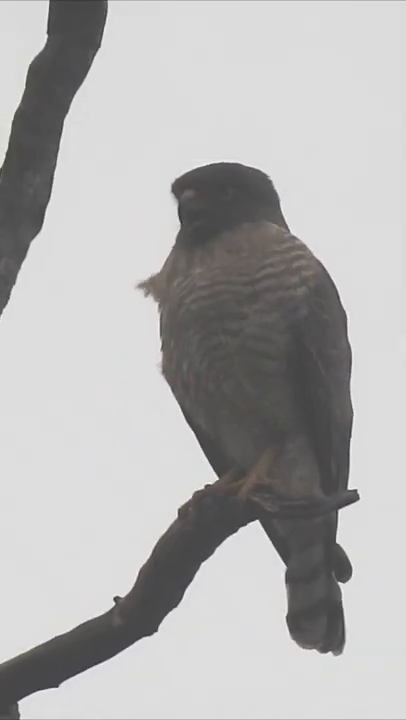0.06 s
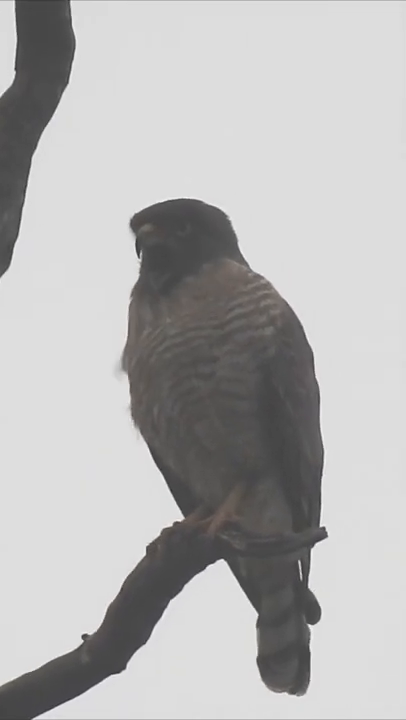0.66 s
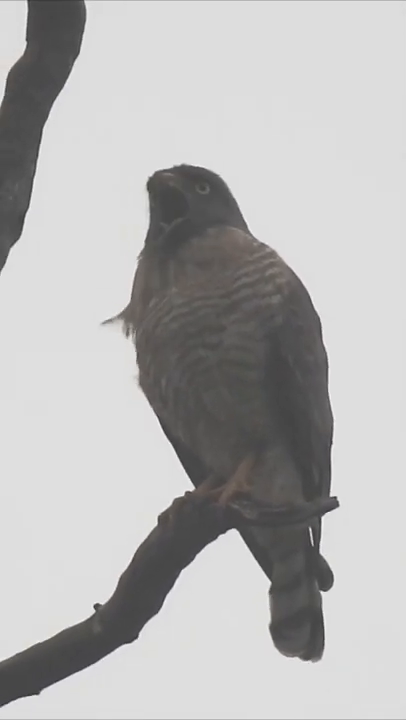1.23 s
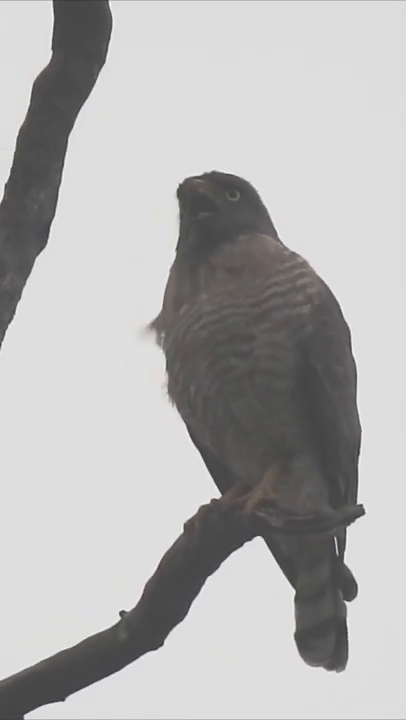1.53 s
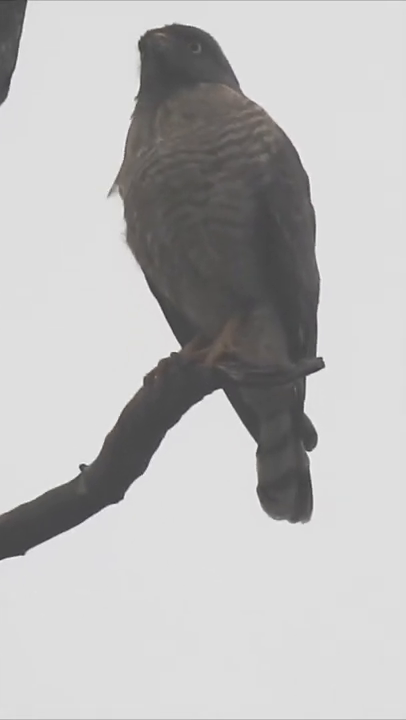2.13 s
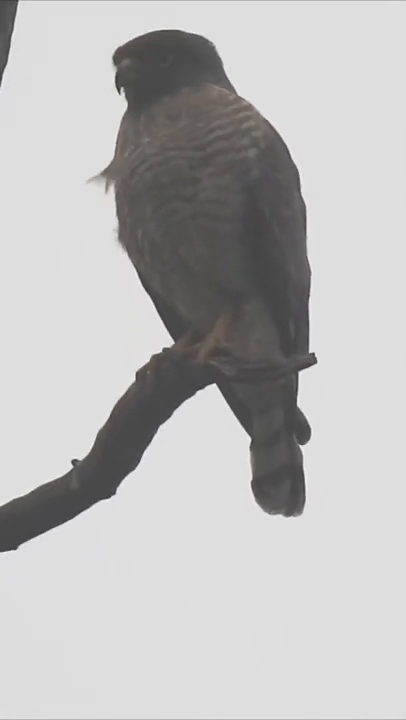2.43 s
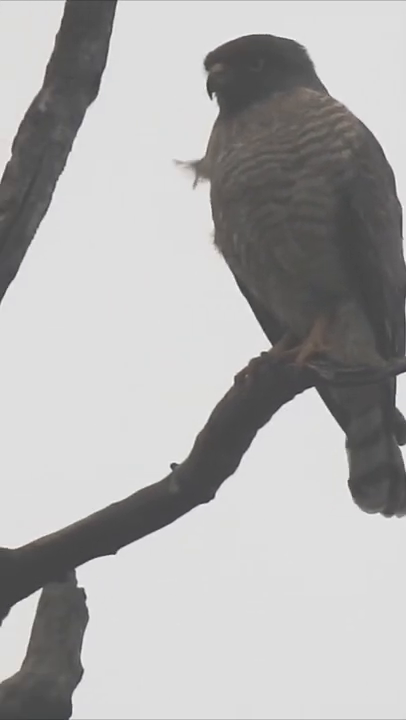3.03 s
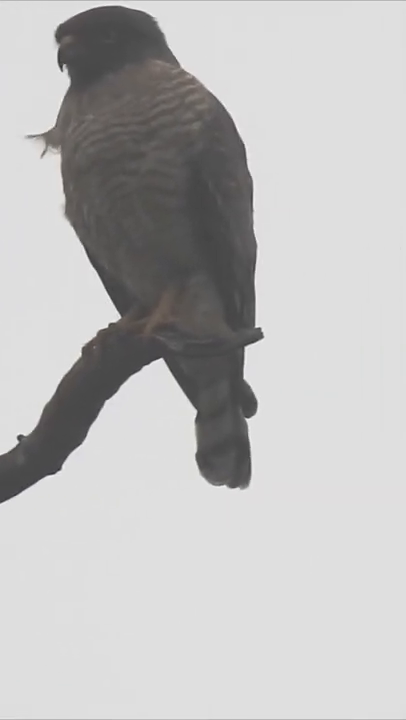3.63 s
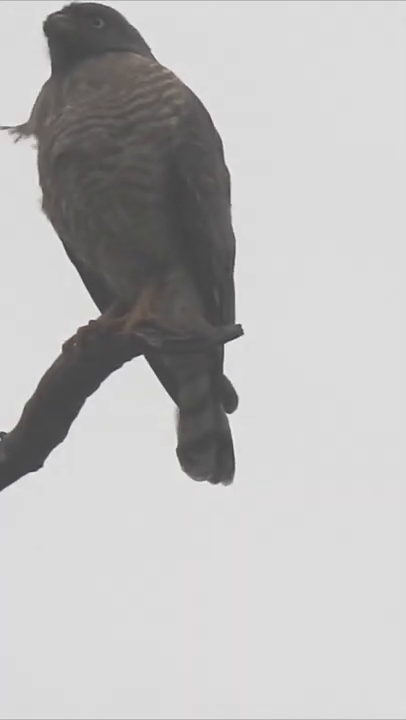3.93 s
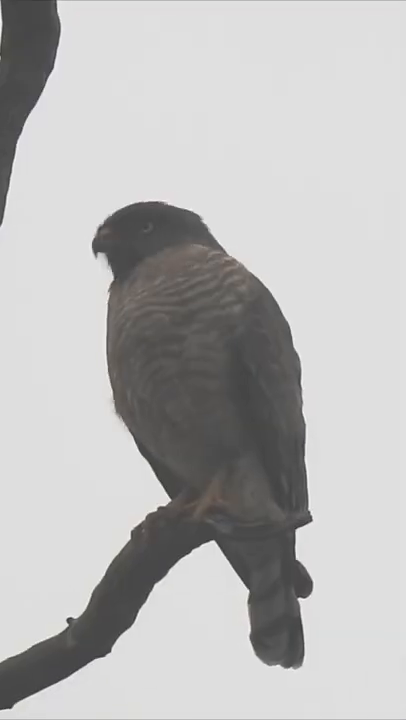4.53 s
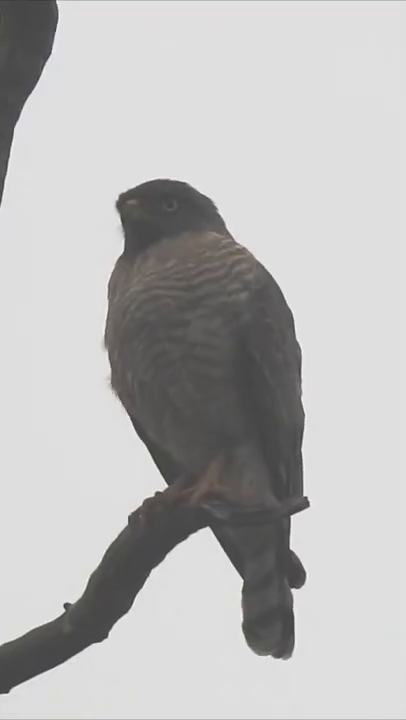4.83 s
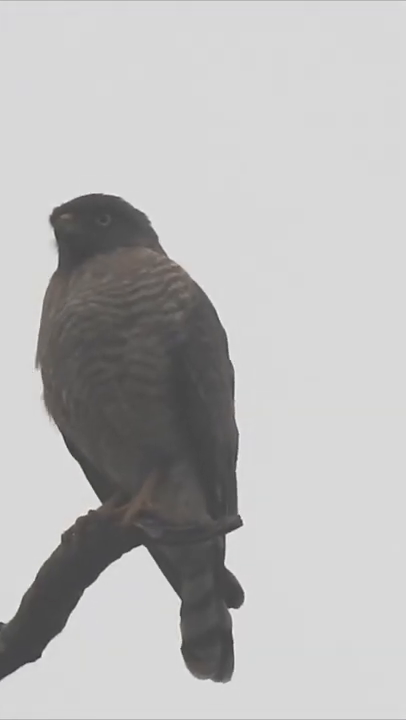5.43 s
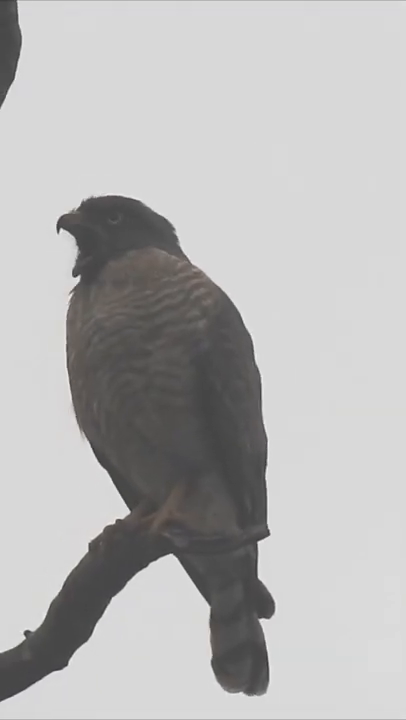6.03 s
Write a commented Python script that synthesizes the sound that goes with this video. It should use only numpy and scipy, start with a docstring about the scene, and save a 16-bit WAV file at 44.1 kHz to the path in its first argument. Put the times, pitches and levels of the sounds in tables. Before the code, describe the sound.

In quiet woods, a hawk screams almost at once: a sharp, raspy rise followed by a drawn-out falling whistle that weakens and ends roughly. Soft, low wind buffets the microphone in the first couple of seconds. Then only a faint hiss and a small bird's scattered, tick-like high chirps remain, until the hawk starts another loud scream just before the end.

```python
"""A hawk on a bare branch gives one long scream and begins a second.
Its voice box shoots up in pitch, turns harsh and doubled at the top, then sinks as a clean whistle
and dies in a rattle as the breath runs out. A small bird chirps in the trees and there is one faint tick.
Air buffets the microphone over the soft hiss of the woods."""
import sys
import numpy as np
from scipy import signal
from scipy.fft import rfft, irfft, next_fast_len
from scipy.io import wavfile
from scipy.ndimage import uniform_filter1d

SR = 44100
rng = np.random.default_rng(int(sys.argv[2]) if len(sys.argv) > 2 else 0)


def put_to_file(sound):
    """Save the sound as 16-bit audio at rate SR, in the file named by the first command-line argument."""
    columns = np.atleast_2d(sound).T  # one column per channel
    safe = np.clip(columns, -1, 1)
    whole_steps = np.round(safe * 32767)
    wavfile.write(sys.argv[1], SR, whole_steps.astype(np.int16))


N = 276948
TIME = np.arange(N) / SR


# How the throat and open beak shape the voice. Each row: frequency in Hz, boost or cut in dB.
THROAT_COLOUR = [(700, -18.5), (1200, -20.5), (1850, -11), (2120, -23.5), (2220, -17.5), (2400, -7.5),
                 (3000, 7), (3700, 7), (4200, -5), (4600, -21), (5300, -9.5), (6700, -4), (7900, -11),
                 (8600, -28.5), (10200, -25), (11400, -30.5), (12200, -58)]

def hawk(split_hz=4600, flutter_db=1.35, twigs_db=-12, far_db=-41):
    """The voice passes through throat and beak; effort sets how loud and how bright it is."""
    pitch_hz, gain, treble_db, (rasp, doubled, quivering, rattling) = scream_shape()
    pulses, stagger = rattle(rattling)
    buzz = voice_box(pitch_hz * stagger, rasp, doubled, quivering, rattling)
    voice = colour(buzz * pulses, THROAT_COLOUR)
    body, treble = (steady(cut(voice, split_hz, kind, order=8)) for kind in ("low", "high"))
    call = (body + from_db(treble_db) * treble) * gain * from_db(flutter_db * drift(64.1))
    highs = cut(call, 6000, "high", order=1)   # thin twigs reflect high sounds best
    twigs = from_db(twigs_db) * echoes(highs, fade_s=.028)
    far = from_db(far_db) * echoes(call, fade_s=0.65)
    return call * pan(-0.61) + twigs + far


# The screams. Each row: start in seconds, relative level in dB, then the seconds from that start until
# the middle of the upward leap, the start of the doubled tone, its end, and the break in the voice.
SCREAM_TIMINGS = [(0.244, -0.5, .066, 0.0964, .21, 0.25), (5.977, -2, .057, .096, .198, 0.263)]
# How the pitch sinks, one list for each scream. Each row: time in seconds, pitch to aim for in Hz.
SINKING_PITCH = [
    [(0.39, 2107), (0.4, 2105), (0.428, 2047), (0.458, 1909), (0.496, 1787), (0.506, 1696), (0.546, 1638),
     (0.586, 1567), (0.624, 1523), (0.648, 1460), (0.696, 1452), (0.778, 1353), (1.034, 1256),
     (1.108, 1241), (1.162, 1188), (1.19, 1205), (1.262, 1185), (1.41, 1157)],
    [(6.1, 2088), (6.12, 2097), (6.144, 2080), (6.186, 1877), (6.232, 1789), (6.275, 1635)],
]
# Fading effort. Each row: seconds since the break, level change in dB, treble change in dB.
EFFORT = [(0, -5, 6.5), (.11, -4, -3), (.29, -14, 5.5), (.6, -15.5, 1), (0.709, -14, -1.5), (.77, -19, -3),
          (0.882, -17, -6), (1.13, -21.5, -5.5)]

def scream_shape(foot_hz=1020, leap_width=.22, switch_s=0.0098, quiver_until_s=.425,
                 rattle_from_s=1.185, release_from_s=1.393, release_db_per_s=450):
    """The voice leaps, doubles, breaks, sinks and rattles: gives its pitch, gain, treble and states."""
    rows = np.array(SCREAM_TIMINGS)
    latest = np.maximum(np.searchsorted(rows[:, 0], TIME) - 1, 0)
    start, scream_db, leap_s, doubles_s, clears_s, breaks_s = rows[latest].T
    age = TIME - start

    # Each state runs from 0 (off) to 1 (on).
    at_top = ramp(age - doubles_s, switch_s)
    doubled = at_top * ramp(clears_s - age, switch_s)
    broken = ramp(age - breaks_s, width_s=0.00575)   # a quick change of register, like a yodel
    quivering = broken * ramp(quiver_until_s - age, width_s=0.023)
    rattling = ramp(age - rattle_from_s, width_s=0.102)
    rasp = (0.05 + 0.55 * (1 - at_top) + 0.343 * rattling
            + 0.846 * at_top * die_away(age - clears_s, decay_s=0.047)
            + 0.23 * broken * die_away(age - breaks_s, decay_s=0.25))

    scoop = 1 - .38 * die_away(age, decay_s=.009)   # starts flat and slides up to the foot of the leap
    leap = .5 + .5 * np.tanh((age / leap_s - 1) / (2 * leap_width))   # an S-curve from 0 to 1
    aim_hz = np.choose(latest, [over_time(curve) for curve in SINKING_PITCH])
    pitch_hz = scoop * (foot_hz + leap * (aim_hz - foot_hz)) * (1 + .03 * rattling)

    gentle = 1 - np.clip(leap / 0.7, 0, 1) ** 2   # full force comes 70% of the way up the leap
    since_s, *fades = np.transpose(EFFORT)
    fade_db, fade_treble_db = (broken * np.interp(age - breaks_s, since_s, fade) for fade in fades)
    release_db = release_db_per_s * np.clip(age - release_from_s, 0, 1)
    # Doubling drains the main tone into the treble.
    level_db = -15 + scream_db - 13 * gentle - 6 * doubled + fade_db - release_db
    treble_db = -4.5 + 3 * gentle + 6.5 * doubled + fade_treble_db
    fade_in = np.clip(age / 0.04, 0, 1)
    return pitch_hz, fade_in * from_db(level_db), treble_db, (rasp, doubled, quivering, rattling)


# The voice's harmonics, at 1, 2, 3 .. times the pitch. Each entry: strength in dB.
HARMONIC_LEVELS = [1, -0.5, -10, -11, -14, -24, -21, -23, -31]
# The extra tones of the doubled voice, at 0.5, 1.5, 2.5 .. times the pitch. Each entry: strength in dB.
IN_BETWEEN_LEVELS = [-14.5, -11.5, -7, -10, -23.5]

def voice_box(pitch_hz, rasp, doubled, quivering, rattling, jitter=.022, waver=.002,
              quiver_hz=433, rattle_quiver_hz=292, shimmer_db=3.3, breath_db=-10):
    """A slightly uneven vibration; when forced, every other cycle differs, adding in-between tones."""
    # After the break a second, slower vibration bends both pitch and strength.
    slow_hz = quiver_hz + (rattle_quiver_hz - quiver_hz) * rattling
    slow_phase = phase_of(slow_hz * (1 + 0.11 * rasp * drift(120)))
    swing = 0.15 * quivering + 0.25 * rattling
    unsteady = 1 + jitter * rasp * drift(457) + waver * drift(41)
    phase = phase_of(pitch_hz * unsteady) + swing * np.sin(slow_phase)
    tone = np.zeros(N)
    for k, level_db in enumerate(HARMONIC_LEVELS, 1):
        strength = from_db(level_db + shimmer_db * drift(3.64))   # each harmonic wavers on its own
        tone += strength * np.sin(k * phase) * (k * pitch_hz < SR / 2)
    slip = 0.59 * drift(302.2)   # the doubling is unstable, which blurs its tones
    for k, level_db in enumerate(IN_BETWEEN_LEVELS, 1):
        tone += doubled * from_db(level_db) * np.sin((k - .5) * phase + slip)
    throb = 1 + 0.17 * swing * np.cos(slow_phase)
    breath = rng.standard_normal(N) * (1 + np.cos(phase))
    return tone * throb + from_db(breath_db) * rasp * breath


def rattle(rattling, pulses_per_s=112, full_depth=0.54, unevenness=0.22, wobble=0.07):
    """As the breath runs out, the tone breaks into pulses and its pitch staggers."""
    depth = full_depth * rattling
    beat = np.cos(phase_of(pulses_per_s * (1 + unevenness * drift(80.2))))
    pulses = 1 + depth * np.tanh(2 * beat)
    stagger = 1 + wobble * depth * drift(211)
    return pulses, stagger


# The small bird's chirps. Each row: start in seconds, level in dB, boost or cut of the direct sound in dB,
# length in seconds, first and last pitch in Hz, how much it lingers mid-slide from 0 to 1.
BIRD_CHIRPS = [(1.855, -28, -5.5, .036, 5750, 7740, 0.02), (2.295, -19.5, 0, .018, 7820, 4330, 0.94),
               (2.951, -39.5, 0.5, .017, 6300, 8150, 0), (3.711, -33, -7, .036, 6940, 8630, 0.15),
               (4.174, -19, 6, 0.016, 5680, 10030, 0), (4.465, -20, 4, 0.016, 5780, 10300, 0),
               (5.339, -18, -3.5, .013, 5680, 9700, 0.06), (5.983, -18, 1.5, .012, 6200, 9460, 0)]

def small_bird(peak_at=0.3, leaves_db=-1):
    """Quick, pure sliding notes that swell and fade, smeared by the leaves they pass through."""
    song, direct = np.zeros((2, N))
    for start_s, level_db, direct_db, length_s, first_hz, last_hz, linger in BIRD_CHIRPS:
        along = np.linspace(0, 1, int(length_s * SR))
        slide = along + linger * np.sin(2 * np.pi * along) / (2 * np.pi)
        pitch_hz = first_hz * (last_hz / first_hz) ** slide
        swell = np.interp(along, [0, peak_at, 1], [0, 1, 0])
        note = from_db(level_db) * swell * np.sin(phase_of(pitch_hz))
        span = slice(int(start_s * SR), int(start_s * SR) + len(note))
        song[span] += note
        direct[span] += from_db(direct_db) * note
    ears = np.array([direct, np.roll(direct, 2)]) * pan(-2.4)   # a little later and louder on the right
    return ears + from_db(leaves_db) * echoes(song, fade_s=0.13)


# The tick. Its two numbers: start in seconds, starting level in dB.
TICK_EVENT = (3.052, -40)
# The tick's tone. Each row: frequency in Hz, relative strength in dB.
TICK_TONE = [(800, -25), (1900, 10), (3500, -23), (6500, 7), (11000, -25)]

def tick(decay_s=0.0024):
    """One faint, dry tick: a burst of noise that dies at once."""
    start_s, level_db = TICK_EVENT
    burst = (TIME >= start_s) * die_away(TIME - start_s, decay_s)
    return from_db(level_db) * burst * air_noise(TICK_TONE)


# How the buffeting and the rumble rise and fall. Each row: time in seconds, relative level in dB.
BUFFET_LEVELS = [(0.0, -48.5), (0.24, -58), (0.47, -45.5), (0.86, -50), (1.26, -39.5), (1.59, -46),
                 (1.85, -44), (2.33, -52.5), (2.68, -55.5), (3.81, -53.5), (4.09, -56), (6.28, -54)]
RUMBLE_LEVELS = [(0.0, -52), (0.03, -67), (0.53, -48), (0.62, -66), (0.9, -40), (0.95, -67), (1.48, -46),
                 (1.52, -63.5), (4.09, -68), (4.85, -50), (5.27, -65), (5.46, -57), (5.58, -72), (6.2, -46)]
# Single puffs of air. Each row: start in seconds, relative peak level in dB.
AIR_PUFFS = [(0.229, -34), (0.393, -32.5), (0.443, -27), (0.487, -21.5), (0.569, -26.5), (0.935, -31),
             (1.078, -35), (1.209, -19.5), (1.282, -27), (1.7, -32), (1.874, -23), (1.93, -29),
             (2.033, -27.5), (2.232, -34.5)]
# The tone of buffeting, rumble and puffs. Each row: frequency in Hz, relative strength in dB.
BUFFET_TONE = [(41, -61), (70, -13), (123, 0), (172, 2), (242, -0.5), (544, -17.5), (600, -14.5),
               (780, -61), (1320, -120)]
RUMBLE_TONE = [(20, -32), (45, 1.5), (65, 10), (95, -2.5), (160, -39)]
PUFF_TONE = [(40, -45.5), (90, -21), (130, -1.5), (175, -1.5), (250, -6), (380, -18.5), (550, -40),
             (1000, -64)]

def wind(lumpy_db=2, buffet_db=1, rumble_db=-2, puff_db=-5, puff_rise_s=0.0075):
    """Air buffets the microphone over a deep rumble, and single puffs strike its right side."""
    buffet = air_noise(BUFFET_TONE) * from_db(buffet_db + over_time(BUFFET_LEVELS) + lumpy_db * drift(9.4))
    pressure = np.zeros(N)
    for start_s, peak_db in AIR_PUFFS:
        age = np.clip((TIME - start_s) / puff_rise_s, 0, 20)
        pressure += from_db(peak_db + puff_db) * age * np.exp(1 - age)
    puff_noise = steady(colour(rng.standard_normal(N), PUFF_TONE))
    puffs = cut(pressure * puff_noise, 95, "high")
    rumble = air_noise(RUMBLE_TONE) * from_db(rumble_db + over_time(RUMBLE_LEVELS))
    return buffet * pan(-0.96) + puffs * pan(-38) + rumble * pan(-2)


# The tone of the distant woods. Each row: frequency in Hz, relative strength in dB.
WOODS_TONE = [(150, -17), (250, -4.5), (347, 2), (398, 0.5), (466, 0.5), (692, -2), (768, -2.5),
              (837, -3.5), (2130, -12.5), (2950, -11.5), (3890, -12), (4320, -9), (5790, -4.5), (8770, -18),
              (15500, -32)]

def woods(level_db=-49, sway_db=1.12):
    """The far hiss of leaves and insects, swaying a little."""
    return air_noise(WOODS_TONE) * from_db(level_db + sway_db * drift(13))


# How alike the air sounds on the left and right. Each row: frequency in Hz, likeness from 0 to 1.
EAR_LIKENESS = [(60, 0.61), (150, 0.61), (380, 0.87), (950, 0.73), (2380, 0.51), (5980, 0.027),
                (15000, 0.01)]

def air_noise(tone):
    """Stereo noise with the given tone, partly alike in both ears."""
    shared, different = rfft(rng.standard_normal((2, N)))
    alike = np.clip(over_frequency(EAR_LIKENESS, N), 0, 1)
    ears = np.sqrt(1 + alike) * shared + np.sqrt(1 - alike) * different * [[1], [-1]]
    return unit_power(colour(irfft(ears, N), tone))


def echoes(x, fade_s):
    """Many faint reflections off twigs and leaves, different at each ear, falling 60 dB in fade_s."""
    t = TIME[:SR]
    tail = rng.standard_normal((2, SR)) * from_db(-60 * t / fade_s) * (t > .002)
    tail /= np.sqrt(np.sum(tail ** 2, axis=1, keepdims=True))
    return signal.fftconvolve(x[None], tail, axes=1)[:, :N]


def colour(x, tone):
    """Boost or cut each frequency by a table of Hz and dB."""
    size = next_fast_len(N + SR)
    return irfft(rfft(x, size) * from_db(over_frequency(tone, size)), size)[..., :N]


def cut(x, hz, kind, order=2):
    """Keep only the "low" or the "high" side of a frequency."""
    return signal.sosfilt(signal.butter(order, hz, kind, fs=SR, output="sos"), x)


def over_time(rows):
    """Join a table's points into a value for every sample."""
    return np.interp(TIME, *np.transpose(rows))


def over_frequency(rows, size):
    """Join a table's points into a value for every frequency in a sound of size samples."""
    hz, value = np.transpose(rows)
    every_hz = np.maximum(np.arange(size // 2 + 1) * SR / size, 1)
    return np.interp(np.log(every_hz), np.log(hz), value)


def phase_of(hz):
    """The angle a vibration has turned through so far."""
    return 2 * np.pi * np.cumsum(hz) / SR


def drift(rate_hz):
    """A random wander, about 1 in size."""
    return unit_power(cut(rng.standard_normal(N + SR), rate_hz, "low")[SR:])


def ramp(t, width_s):
    """Rise from 0 to 1 around t = 0."""
    return np.clip(.5 + t / width_s, 0, 1)


def die_away(t, decay_s):
    """Stay at 1 until t = 0, then fade."""
    return np.exp(-np.maximum(t, 0) / decay_s)


def steady(x):
    """Even out the loudness from moment to moment."""
    power = uniform_filter1d(uniform_filter1d(x ** 2, size=500), size=400)
    return x / np.sqrt(np.abs(power) + 1e-9)


def unit_power(x):
    """Scale to an average power of 1."""
    return x / np.sqrt(np.mean(x ** 2) + 1e-20)


def pan(left_db):
    """Left and right gains; a negative number leans to the right."""
    gains = from_db(np.array([[left_db], [-left_db]]) / 2)
    return gains / gains.mean()


def from_db(db):
    """Turn decibels into a multiplier."""
    return 10 ** (np.asarray(db) / 20)


def scene():
    """Both birds in the open air."""
    return hawk() + small_bird() + tick() + wind() + woods()


def record(dry, cutoff_hz=15750):
    """Cut off the very highest treble steeply."""
    return signal.sosfilt(signal.ellip(12, .1, 80, cutoff_hz, fs=SR, output="sos"), dry)


dry = scene()
out = record(dry)
put_to_file(out)
```